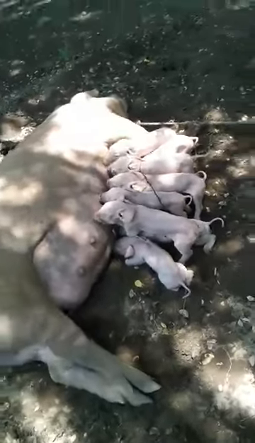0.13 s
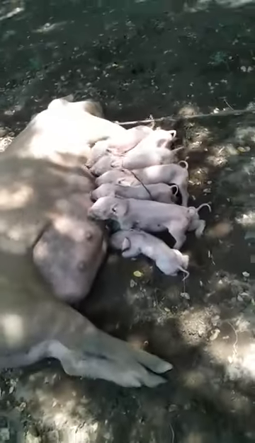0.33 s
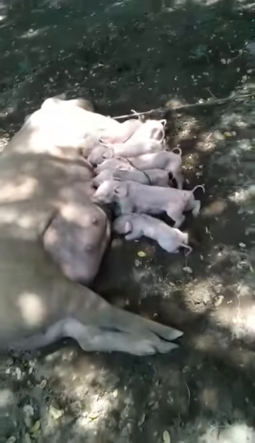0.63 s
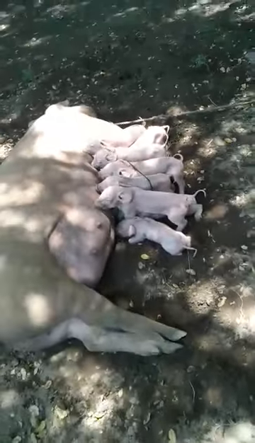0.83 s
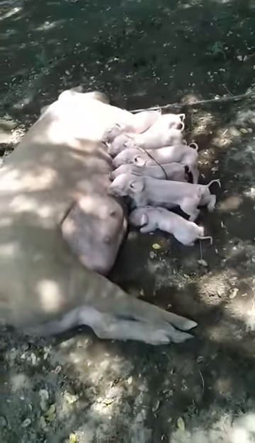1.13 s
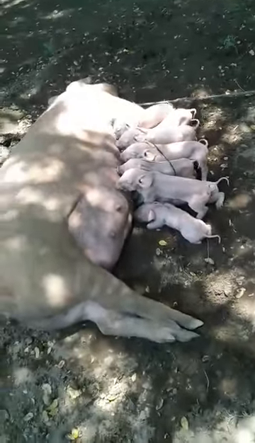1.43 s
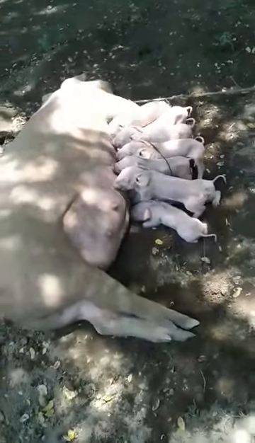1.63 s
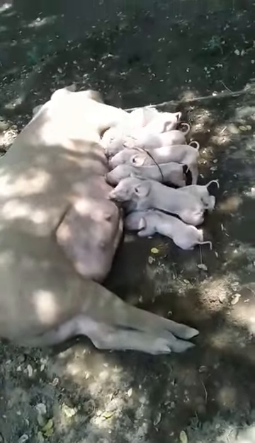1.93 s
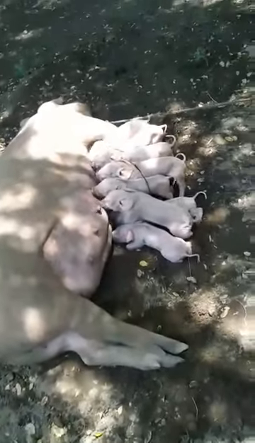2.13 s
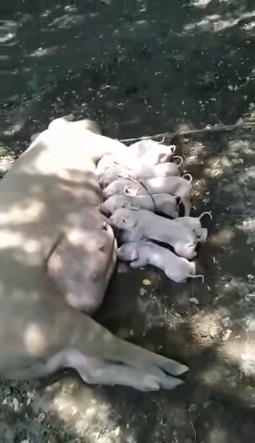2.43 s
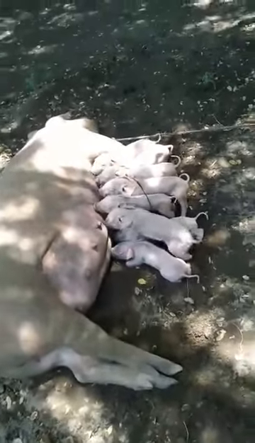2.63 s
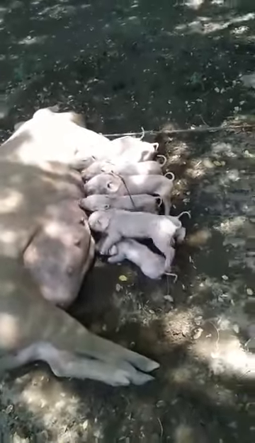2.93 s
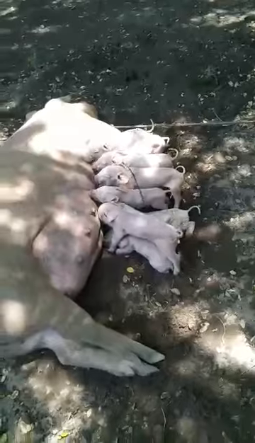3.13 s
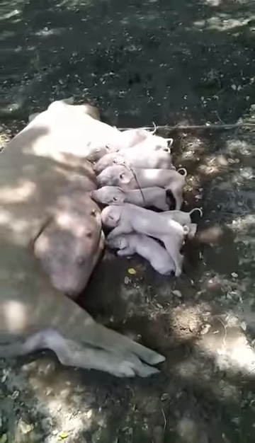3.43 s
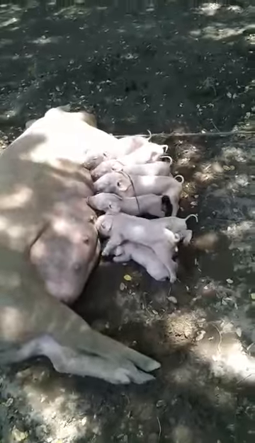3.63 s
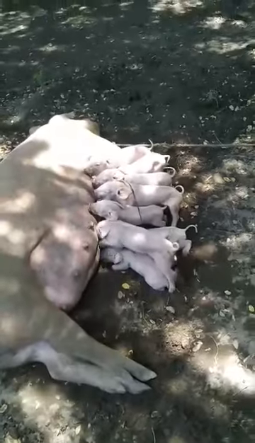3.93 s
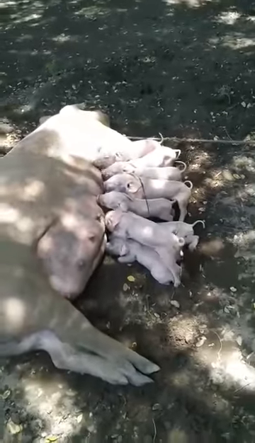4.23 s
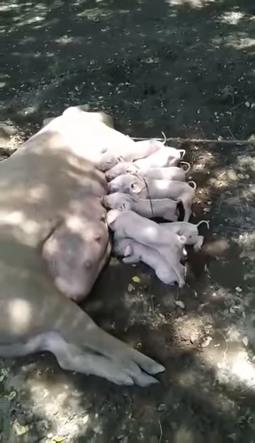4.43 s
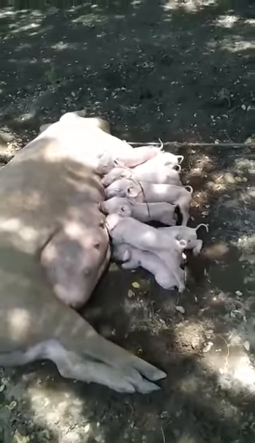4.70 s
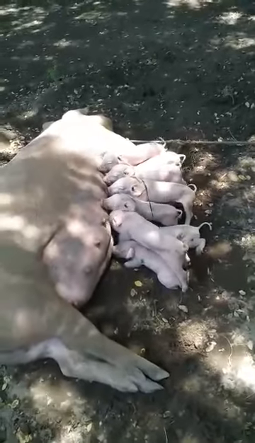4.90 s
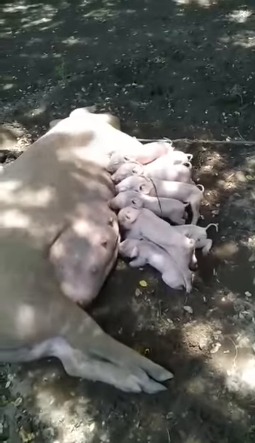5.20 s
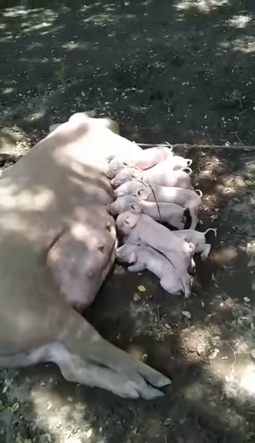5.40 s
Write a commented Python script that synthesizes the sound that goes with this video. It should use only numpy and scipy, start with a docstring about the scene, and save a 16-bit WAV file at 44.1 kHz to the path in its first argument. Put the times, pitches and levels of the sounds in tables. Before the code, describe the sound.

Steady low pig grunts in an open yard; loud smacking and rustling at first, then quieter, with faint chirps and whistles.

```python
"""A sow grunts about twice a second in a yard while her piglets nurse.
At first loud smacks, brisk soil scuffs and far fowl surround her; a bird's high hooked squeak keeps coming back.
After about two seconds smacks and scuffs weaken and thin whistles join; faint bird pips sound throughout.
Each grunt is a nasal resonant hum, then three slow flaps of the throat ringing chest and snout.
Smacks and scuffs are shaped noise, calls are gliding sines; most sources add scattered yard echoes."""
import sys
import numpy as np
from scipy import signal
from scipy.fft import rfft, irfft, next_fast_len
from scipy.io import wavfile
from scipy.ndimage import uniform_filter1d

SR = 44100
rng = np.random.default_rng(int(sys.argv[2]) if len(sys.argv) > 2 else 0)


def master(y):
    """Save y as 16-bit WAV."""
    cut = np.clip(np.atleast_2d(y).T, -1, 1)
    pcm = np.round(cut * 32767)  # scale
    wavfile.write(sys.argv[1], SR, pcm.astype(np.int16))


N = 245195

# low chest resonances: (nominal pitch [Hz], level [dB], nominal time to peak [s])
CHEST_MODES = [(156.3, -11, 0.007), (85.5, -21.5, .012), (265, -20.5, 0.01)]


def gain_of(db):
    """Decibels to amplitude."""
    return 10 ** (np.asarray(db) / 20)


def evened(x):
    """Scales to rms 1."""
    return x / np.sqrt(np.mean(x ** 2) + 1e-20)


def read(points, hz):
    """Reads a table on a log-frequency axis."""
    f, value = np.transpose(points)
    return np.interp(np.log(hz + 1), np.log(f + 1), value)


def add(mix, s, sound):
    """Mixes a sound in at time s."""
    part = mix[max(round(s * SR), 0):][:len(sound)]
    part += sound[:len(part)]


def coloured(x, spectrum):
    """Filters by a (frequency [Hz], level [dB]) table."""
    size = next_fast_len(len(x))
    response = gain_of(read(spectrum, np.fft.rfftfreq(size, 1 / SR)))
    return irfft(rfft(x, size) * response, size)[:len(x)]


def wander(size, rate_hz):
    """Low-passed noise of rms near 1."""
    order = next_fast_len(size + 4096)
    hz = np.fft.rfftfreq(order, 1 / SR)
    spectrum = rfft(rng.standard_normal(order)) / (1 + (hz / rate_hz) ** 4)
    return evened(irfft(spectrum, order))[:size]


def patchy(x, depth_db, frame_count=9, bin_count=7):
    """Lets narrow time-frequency regions of a hiss swell and fade on their own; rms 1."""
    z = signal.stft(x, nperseg=512, noverlap=384)[2]
    patch = np.outer(np.hanning(bin_count * 2), np.hanning(frame_count * 2))
    field = signal.fftconvolve(rng.standard_normal(z.shape), patch, "same")
    return evened(signal.istft(z * gain_of(depth_db * evened(field)), nperseg=512, noverlap=384)[1][:N])


def yard(x, delay_s=0.0051, turn_hz=0.694):
    """Scattered echoes, each band dying at its own speed; the pattern shifts as the microphone sways."""
    # decay of the echoes: (frequency [Hz], time to fall 60 dB [s])
    band_t60 = [(100, 0.46), (400, 0.34), (1500, 0.37), (5000, 0.32), (8000, 0.37), (13000, 0.53)]
    hz, t, z = signal.stft(rng.standard_normal((3, SR)), SR, nperseg=256)
    decay = gain_of(-60 * t / read(band_t60, hz)[:, None])
    tails = signal.istft(z * decay, SR, nperseg=256)[1]
    tails *= 1 - np.exp(-(np.arange(tails.shape[1]) / SR / delay_s) ** 2)
    # three independent tails, blended in rotation
    turn = 2 * np.pi * (turn_hz * np.arange(N) / SR + np.arange(3)[:, None] / 3)
    shares = np.cos(turn) * np.sqrt(2 / 3)
    return signal.fftconvolve(x * shares, tails / np.linalg.norm(tails[0]), axes=1)[:, :N].sum(0)


def progress(length_s):
    """Runs from 0 to 1 over a call."""
    return np.linspace(0, 1, int(length_s * SR))


def note(glide_hz, rough, warble, warble_hz, shape_db=0, taper=0.45, stagger=.02):
    """One gliding tone that slips unevenly, frayed by a fast warble; rms 1."""
    size = len(glide_hz)
    fray, shake = (wander(size, warble_hz) for _ in range(2))
    slips, swells = (wander(size, rate_hz=31.7) for _ in range(2))
    hz = glide_hz * (1 + rough * (warble * fray + stagger * slips))
    tone = np.sin(2 * np.pi * np.cumsum(hz) / SR)
    tone = tone * (1 + .5 * rough * shake) * gain_of(shape_db + 3.4 * swells)
    return evened(tone * signal.windows.tukey(size, taper))


def air(level_db=-72.5):
    """The quiet outdoor background: coloured, patchy noise."""
    # spectrum: (frequency [Hz], relative level [dB])
    air_colour = [(20, -23.5), (45, 1.5), (70, 15.5), (140, 10.5), (300, 2.5), (600, -8), (1200, -12),
                  (2500, -31.5), (4200, -14.5), (8000, -52), (11000, -80)]
    hiss = patchy(rng.standard_normal(N), depth_db=3.0)
    return gain_of(level_db) * evened(coloured(hiss, air_colour))


def fowl(direct_db=-2, echo_db=-4, arch_drop=0.0564):
    """Long hoarse calls from far off, each a shallow arch losing arch_drop of its pitch at both ends."""
    # calls: (time [s], length [s], nominal top pitch [Hz], level before direct/echo gain [dB], roughness [0-1])
    calls = [(0, .48, 1466, -59.5, 0.49), (0.999, 0.51, 1410, -62, 0.46), (1.122, 0.27, 1820, -67, 0.24),
             (1.657, 0.093, 1874, -59.5, 0.98), (2.103, 0.44, 1532, -68, 0.11),
             (2.858, .22, 1400, -69.5, 0.48), (4.466, 0.3, 1387, -68, 0.7), (5.38, 0.21, 1470, -70, 0.45)]
    out = np.zeros(N)
    for s, length_s, top_hz, db, rough in calls:
        arch_hz = top_hz * (1 - arch_drop * (2 * progress(length_s) - 1) ** 2)
        add(out, s, gain_of(db) * note(arch_hz, rough, warble=0.08, warble_hz=124.1))
    return gain_of(direct_db) * out + gain_of(echo_db) * yard(out)


def chirps(direct_db=-6, echo_db=-11, fall_share=.05, rough=0.083):
    """Brief, slightly falling pips: a few clear ones among many faint ones from birds further off."""
    # clear chirps: (time [s], length [s], nominal mid pitch [Hz], level before direct/echo gain [dB])
    clear = [(1.622, 0.016, 2750, -60), (1.745, 0.029, 2980, -54), (3.367, 0.014, 2820, -64),
             (3.902, 0.029, 1810, -68.5), (4.387, 0.077, 930, -66), (4.822, 0.055, 2143, -67),
             (4.967, .023, 2020, -63.5), (5.087, 0.026, 1980, -59.5), (5.201, 0.017, 1947, -57)]
    # span of the faint pips: (lowest, highest) [Hz]
    pip_range = (2600, 8545)
    pips_per_s, pip_s, pip_db, spread_db = 7, 0.028, -71, 3
    pitches_hz = np.geomspace(*pip_range, 101)
    faint = []
    for when, high, near in rng.random((int(pips_per_s * N / SR), 3)):
        faint.append((when * N / SR, pip_s, pitches_hz[int(high * 100)], pip_db + spread_db * (2 * near - 1)))
    out = np.zeros(N)
    for s, length_s, hz, db in clear + faint:
        fall_hz = hz * (1 - fall_share * (progress(length_s) - .5))
        add(out, s, gain_of(db) * note(fall_hz, rough, warble=.042, warble_hz=204.2))
    return gain_of(direct_db) * out + gain_of(echo_db) * yard(out)


def whistles(direct_db=-12, echo_db=-13.5, ease=1.3):
    """Single thin bird glides, fast at first, then levelling off (ease 1 is an even glide)."""
    # glides: (time [s], length [s], start [Hz], end [Hz], level before direct/echo gain [dB], roughness [0-1])
    glides = [(2.269, 0.14, 4405, 3830, -58, 0.28), (2.402, 0.086, 3090, 2963, -55, 0.35),
              (2.7, 0.052, 5360, 6700, -46, 0.6), (2.884, .23, 4347, 2664, -50.5, 0.52),
              (3.024, .1, 7140, 6960, -54, 0.63), (3.132, 0.11, 4410, 3840, -49.5, 0.87),
              (3.575, 0.18, 4497, 3923, -55.5, 0.11), (3.787, 0.17, 3780, 3350, -61.5, 0.02),
              (4.082, 0.048, 4190, 4100, -61, .3), (4.303, 0.0668, 4250, 3865, -51, 0.63),
              (4.531, 0.078, 2800, 2614, -50.5, 0.46), (4.609, 0.046, 6150, 5100, -62, 0.58),
              (4.842, 0.11, 5480, 6680, -46, 0.45), (5.45, 0.1, 3980, 4210, -58, 0.23)]
    out = np.zeros(N)
    for s, length_s, start_hz, end_hz, db, rough in glides:
        glide_hz = end_hz + (start_hz - end_hz) * (1 - progress(length_s)) ** ease
        add(out, s, gain_of(db) * note(glide_hz, rough, warble=.07, warble_hz=384))
    return gain_of(direct_db) * out + gain_of(echo_db) * yard(out)


def squeaks(direct_db=-12, echo_db=-10.5, slide_end_ratio=.6, slide_end_db=-16):
    """One hooked bird call: a bright head that breaks downward and a fading slide, smeared by the yard."""
    # calls: (time [s], head length [s], slide length [s], pitch scale [Hz], level before direct/echo gain [dB])
    calls = [(0.151, 0.047, 0.077, 7490, -38), (1.154, .06, 0.1, 7380, -43),
             (2.15, 0.055, 0.081, 7630, -37.5), (2.347, .068, 0.011, 7547, -33.5),
             (4.323, 0.071, .16, 7114, -45.5)]
    # contour of the head: (share of the head [0-1], pitch over pitch scale [ratio], relative level [dB])
    hook = [(0, 0.97, -14), (.3, 0.94, -2), (0.451, 0.97, 1.5), (.66, 0.97, -0.5), (0.798, .8, -6),
            (1, .69, -10.5)]
    out, (share, ratio, shape_db) = np.zeros(N), np.transpose(hook)
    for s, head_s, slide_s, top_hz, db in calls:
        t = np.arange(0, head_s + slide_s, 1 / SR)
        knots_s = [*share * head_s, head_s + slide_s]
        glide_hz = top_hz * np.interp(t, knots_s, [*ratio, slide_end_ratio])
        call_db = np.interp(t, knots_s, [*shape_db, slide_end_db])
        call = note(glide_hz, rough=.35, warble=0.064, warble_hz=410, shape_db=call_db, taper=0.12)
        add(out, s, gain_of(db) * call)
    return gain_of(direct_db) * out + gain_of(echo_db) * yard(out)


def bumps():
    """Soft bodies knock against the ground and each other: dull noise thuds."""
    # thuds: (time [s], nominal level [dB], twice the time to peak [s])
    thuds = [(0.421, -40.5, 0.016), (1.849, -46.5, 0.075), (1.981, -44, 0.056), (2.049, -48, 0.067),
             (3.144, -50, 0.02), (4.12, -52.5, 0.02)]
    # thud spectrum: (frequency [Hz], relative level [dB])
    flesh_colour = [(40, -20.5), (100, 2), (260, 0), (420, -2), (700, -9.5), (1000, -27.5), (3000, -51.5)]
    out, t = np.zeros(N), np.arange(SR // 4) / SR
    for s, db, decay_s in thuds:
        thud = evened(coloured(rng.standard_normal(len(t)), flesh_colour))
        add(out, s, gain_of(db) * thud * t / decay_s * np.exp(1 - t / decay_s * 2))
    return out


def scuff_level(rise_db_per_s=350, fall_db_per_s=122.5, fidget_db=-82.5):
    """Rubbing level [dB]: each scuff rises, holds and dies back into the litter's constant fidgeting."""
    # scuffs: (time of full level [s], hold [s], level [dB])
    scuffs = [(0, .28, -56.5), (0.346, 0.3, -51.5), (.97, 0.038, -57.5), (1.214, 0.021, -53.5),
              (1.447, 0.036, -56.5), (1.882, 0.037, -54.5), (2.683, 0.047, -64.5), (3, 0.085, -69.5),
              (3.247, 0.019, -69.5), (3.923, 0.04, -78.5), (4.638, 0.069, -70), (4.961, 0.13, -73),
              (5.203, 0.072, -77.5), (5.338, 0.05, -71.5)]
    t, power = np.arange(N) / SR, gain_of(fidget_db) ** 2
    for s, length_s, db in scuffs:
        before_db = rise_db_per_s * np.maximum(s - t, 0)
        after_db = fall_db_per_s * np.maximum(t - s - length_s, 0)
        power = power + gain_of(db - before_db - after_db) ** 2
    return 10 * np.log10(power)


def shuffle(grains_per_s=500, grit=0.43, bright_db=3, light_bright_db=3):
    """Trotters and bellies rub the soil: an even hiss when brisk, small crisp rustles when light."""
    # rub spectrum: (frequency [Hz], relative level [dB])
    soil_colour = [(300, -22.5), (1000, -13), (2500, 2), (5000, -2.5), (8000, 5), (10000, -5.5),
                   (13000, -8)]
    hits = (rng.random(N) < grains_per_s / SR) * rng.standard_normal(N)
    grains = hits * gain_of(2.7 * np.minimum(rng.exponential(1, N), 4))
    rub = coloured(rng.standard_normal(N) + grit * evened(grains), soil_colour)
    db = scuff_level()
    brisk = np.interp(db, [-66, -56], [0, 1])
    even_hiss = patchy(rub, depth_db=3)
    rustle = patchy(rub, depth_db=5.5, frame_count=8, bin_count=5)
    hiss = brisk * even_hiss + (1 - brisk) * rustle
    top = signal.sosfiltfilt(signal.butter(3, 9500, "high", fs=SR, output="sos"), hiss)
    # each fresh push brightens the rub
    push = np.clip((db - uniform_filter1d(db, SR // 2)) / 5, -2, 2)
    top_db = bright_db * push + light_bright_db * (-0.5 - brisk)
    return (hiss + top * (gain_of(top_db) - 1)) * gain_of(db)


def smacks(echo_db=-10, ring_echo_db=-14, bounce_s=0.0054, bounce_db=-19, lead_db=-24, lead_s=0.0047):
    """A burst of a few milliseconds rings a small mouth cavity, after a faint lead-in hiss."""
    # smacks: (time [s], nominal level [dB], ring pitch [Hz], ring relative level [dB], half the time to peak [s])
    bursts = [(0.0357, -23, 7740, 0.5, 0.001), (0.2462, -20.5, 7170, -2.5, 0.0011),
              (.465, -23, 7860, -0.5, 0.0014), (0.56, -44.5, 3020, 4, 0.0016),
              (.6, -39.5, 3140, -15, 0.00072), (0.6915, -20.5, 7877, -0.5, 0.00093),
              (.799, -38.5, 2770, -9, 0.00041), (0.9627, -27, 1313, -6.5, 0.0013),
              (1.23, -38, 2960, -6.5, 0.0017), (1.46, -27, 7640, -27, 0.0016),
              (1.6518, -22, 8950, -3, 0.0013), (1.8729, -20.5, 8750, 9, 0.00084),
              (1.977, -38, 4860, -12, 0.00033), (2.711, -57, 4780, 3.5, 0.0017),
              (3.145, -58, 2730, 7, 0.0017), (3.238, -42.5, 4560, -3.5, 0.00073),
              (3.264, -52.5, 3940, 8.5, 0.00055), (4.835, -48.5, 7200, 7, .0018),
              (5.021, -55.5, 8710, 5.5, 0.0017)]
    # burst spectrum: (frequency [Hz], relative level [dB])
    fizz_colour = [(100, -7), (750, -19.5), (1200, -0.5), (3000, -7), (4600, 5), (6200, -4), (7800, 7),
                   (9200, 3), (10200, -6.5), (13000, -11.5)]
    near, spread, t = np.zeros(N), np.zeros(N), np.arange(1024) / SR
    for s, db, ring_hz, ring_db, rise_s in bursts:
        swell = gain_of(db) * (t / (2 * rise_s)) ** 3 * np.exp(3 - 1.5 * t / rise_s)
        fizz = evened(coloured(rng.standard_normal(len(t)), fizz_colour))
        # same energy as the swell
        burst = swell * fizz * np.linalg.norm(swell) / np.linalg.norm(swell * fizz)
        cavity = gain_of(ring_db) * swell * np.sqrt(2) * np.sin(2 * np.pi * ring_hz * t)
        lead = gain_of(db + lead_db) * fizz * np.exp(-t[::-1] / lead_s)
        add(near, s + rise_s - t[-1], lead)
        add(near, s, burst + cavity)
        add(near, s + bounce_s, gain_of(bounce_db) * burst)  # off the ground
        add(spread, s, burst + gain_of(ring_echo_db) * cavity)  # the ring is beamed and scatters less
    return near + gain_of(echo_db) * yard(spread)


def throb(hz, db, rise_s, t):
    """A few cycles of a resonance under one smooth push of air."""
    push = t / rise_s * np.exp(.5 - .5 * (t / rise_s) ** 2)
    return gain_of(db) * push * np.sin(2 * np.pi * hz * t)


def hum(gap_s, snout_hz=440, rise_s=0.008, nasal_hz=1230, nasal_db=-20, second_db=-2, chest_db=-17, flutter=.25):
    """Before the folds slap, two soft puffs of air set the snout singing."""
    t = np.arange(int(.08 * SR)) / SR
    out = np.zeros(len(t) + SR // 10)
    for s, db in ((0, 0), (gap_s, second_db)):
        puff = throb(snout_hz * rng.normal(1, 0.022), db, rise_s, t)
        puff += throb(nasal_hz * rng.normal(1, 0.02), db + nasal_db, rise_s, t)
        puff += throb(CHEST_MODES[0][0], db + chest_db, rise_s, t)
        add(out, s, puff * (1 + flutter * wander(len(t), rate_hz=140)))
    return out


def flap(rasp_db, chest_db, stretch, spit=0.1, spit_decay_s=0.0043, crack_db=-14, crack_s=0.0011, shape_db=2.5):
    """One slap of the throat folds rings chest and snout; its closure cracks and wakes upper resonances."""
    # main snout resonance at stretch 1: (pitch [Hz], level [dB], time to peak [s])
    snout_mode = (403, 0, .0043)
    # upper resonances of the rasp: (nominal pitch [Hz], nominal level [dB], nominal time to peak [s])
    throat_modes = [(675, -12.5, 0.0031), (1223, -15, 0.0033), (1670, -23.5, 0.0014), (2395, -22, 0.0027),
                    (2925, -20, 0.0028), (3744, -25, 0.004)]
    t = np.arange(4096) / SR
    closure = spit * rng.standard_normal(len(t)) * np.exp(-t / spit_decay_s)
    closure[0] += 1
    throat = sum(throb(hz, db + rng.normal(0, shape_db), rise_s, t * rng.normal(1, 0.023))
                 for hz, db, rise_s in throat_modes)
    upper = signal.fftconvolve(closure, throat)[:len(t)]
    crack = wander(len(t), rate_hz=2200) * np.exp(-t / crack_s)
    chest = sum(throb(*mode, t * rng.normal(1, 0.072)) for mode in CHEST_MODES)
    # the walls of the snout swallow the treble
    soft_tissue = signal.butter(6, 4100, fs=SR, output="sos")
    rasp = signal.sosfilt(soft_tissue, upper / 2 + gain_of(crack_db) * crack)
    return gain_of(rasp_db) * rasp - gain_of(chest_db) * chest - throb(*snout_mode, t * stretch)


def sow(sag=0.032, echo_db=-4, puff_share=0.22, gurgle_db=-18, gurgle_s=0.032):
    """A hum, then three flaps while the snout resonance sinks; loose flesh gurgles between them."""
    # grunts: (time of middle flap [s], level [dB], opening flap relative level [dB],
    #   closing flap relative level [dB], rasp level [dB], rasp change per flap [dB], hum relative level [dB])
    grunts = [(.234, -24, -1.5, -11, -1, -6, -12.5), (.613, -26.5, -1, -37, 1.5, -.5, -10.5),
              (.892, -30, -2.5, -1, 10, 3.5, -25.5), (1.4625, -26.5, -5, -43, 6.5, 0, -17.5),
              (1.938, -25, -10, -10.5, -3, 7.5, -21.5), (2.1686, -33, 0, -6.5, 7, 1, -21),
              (2.671, -26.5, -4.5, -6.5, -8, 12, -15), (3.2619, -25.5, 0.5, -21, 0, 0, -17.5),
              (3.746, -27.5, -7.5, -22.5, -11, 7.5, -13), (4.2366, -28, -1, -27.5, -7, -10.5, -12),
              (4.9574, -31.5, -6, -19.5, -11, -5.5, -12.5), (5.3949, -28, -1, -14.5, -2, -3, -12)]
    # gurgle spectrum: (frequency [Hz], relative level [dB])
    gurgle_colour = [(60, -19.5), (155, 1), (260, -5.5), (400, -0.5), (540, -4), (700, -12), (900, -29.5),
                     (1050, -41), (1220, -19.5), (1500, -33), (5000, -63.5)]
    # echo spectrum: (frequency [Hz], relative level [dB])
    echo_colour = [(60, 1), (150, -5.5), (400, -6), (700, -1.5), (1300, -0.5), (4000, -0.5)]
    flap_s, hum_lead_s = .032, .074  # flap spacing; hum start ahead of the middle flap
    chest_db, chest_step_db = 2, 6  # the chest joins in more with each flap
    out, t = np.zeros(N), np.arange(SR // 4) / SR
    bell = np.exp(-.5 * ((t - t.mean()) / gurgle_s) ** 2)
    for s, db, opening_db, closing_db, rasp_db, rasp_step_db, hum_db in grunts:
        add(out, s - hum_lead_s, gain_of(db + hum_db) * hum(hum_lead_s * puff_share))
        gurgle = evened(coloured(rng.standard_normal(len(t)), gurgle_colour)) * bell
        add(out, s - t.mean(), gain_of(db + gurgle_db) * gurgle)
        for k, rel_db in zip((-1, 0, 1), (opening_db, 0, closing_db)):
            slap = flap(rasp_db + k * rasp_step_db, chest_db + k * chest_step_db, 1 - sag * k)
            add(out, s + k * flap_s, gain_of(db + rel_db) * slap)
    return out + gain_of(echo_db) * coloured(yard(out), echo_colour)


def scene():
    """Everything is heard from the middle: two equal channels."""
    birds = fowl() + chirps() + whistles() + squeaks()
    piglets = bumps() + shuffle() + smacks()
    mono = air() + birds + piglets + sow()
    return np.array([mono, mono])


def record(dry, low_cut_hz=37, edge_hz=13150):
    """The recorder's bass cut and band limit."""
    thinned = signal.sosfilt(signal.butter(3, low_cut_hz, "high", fs=SR, output="sos"), dry)
    band_limit = signal.firwin(401, edge_hz, window=("kaiser", 8), fs=SR)
    return signal.oaconvolve(thinned, band_limit[None], "same", axes=1)


dry = scene()
out = record(dry)
master(out)
```